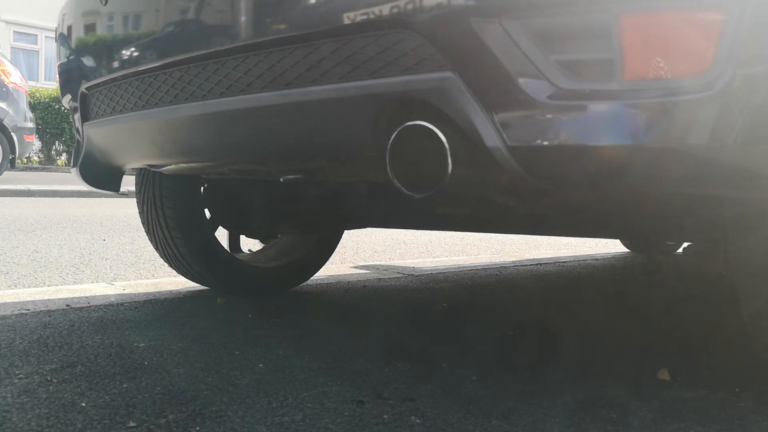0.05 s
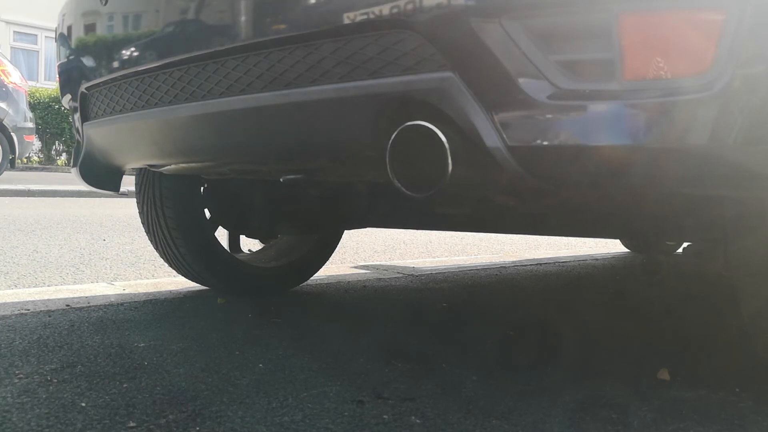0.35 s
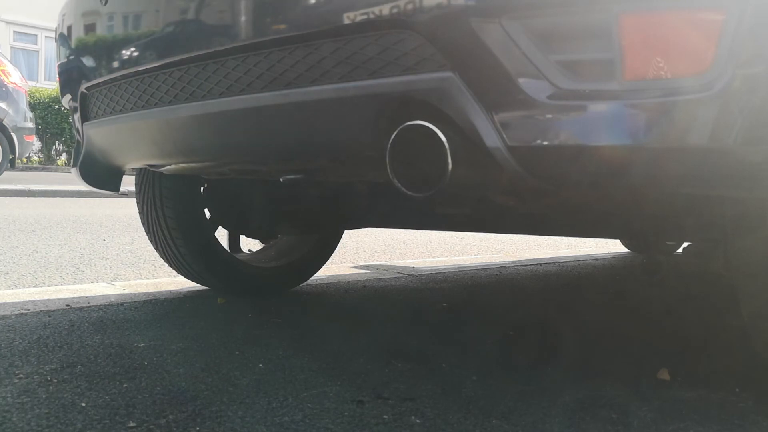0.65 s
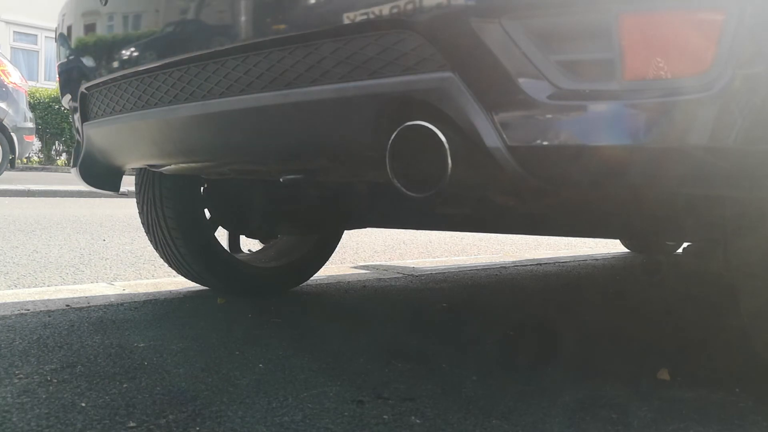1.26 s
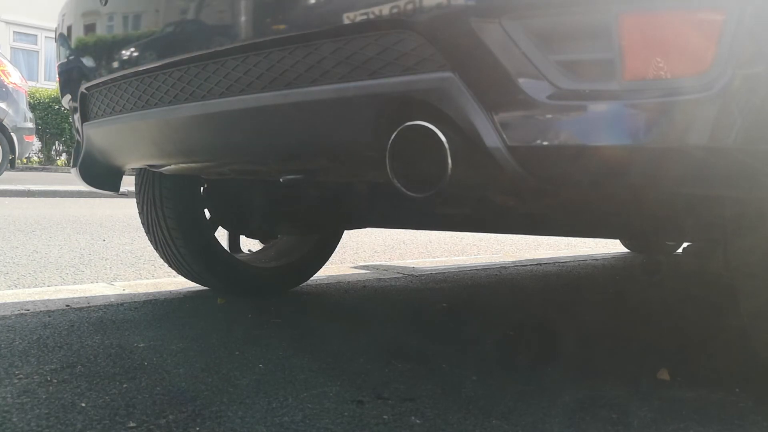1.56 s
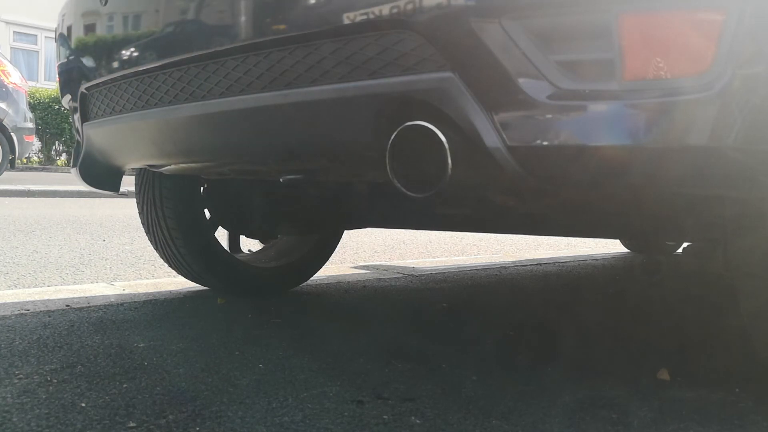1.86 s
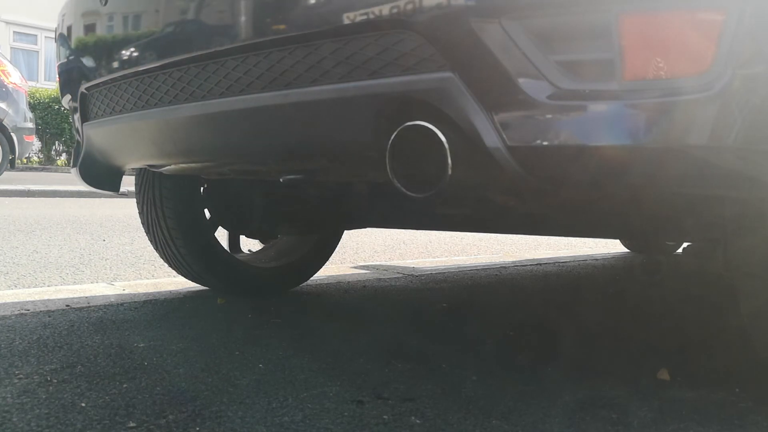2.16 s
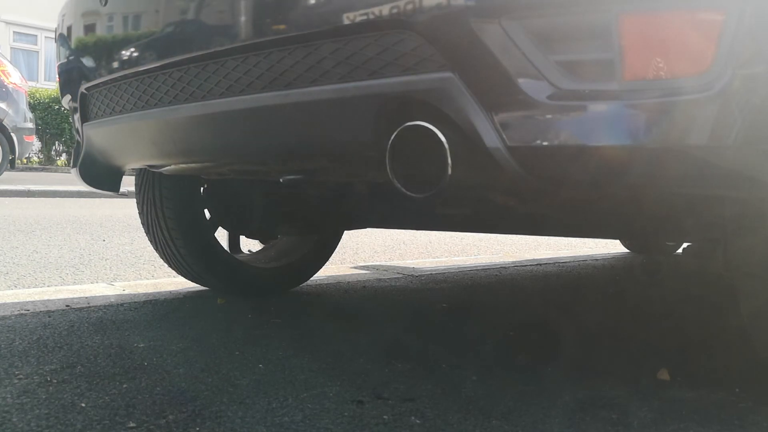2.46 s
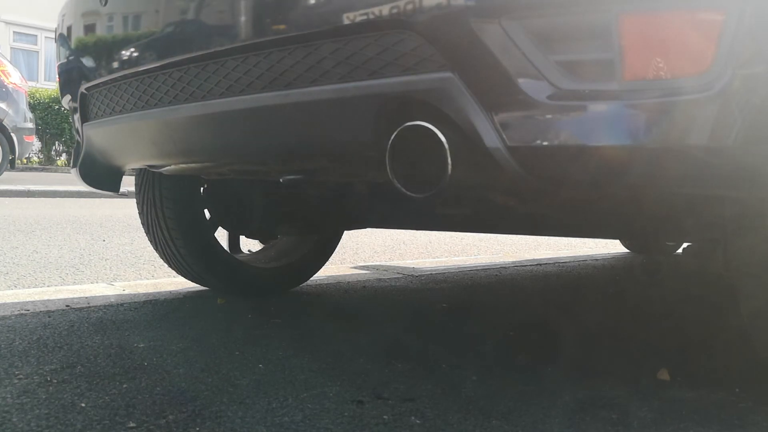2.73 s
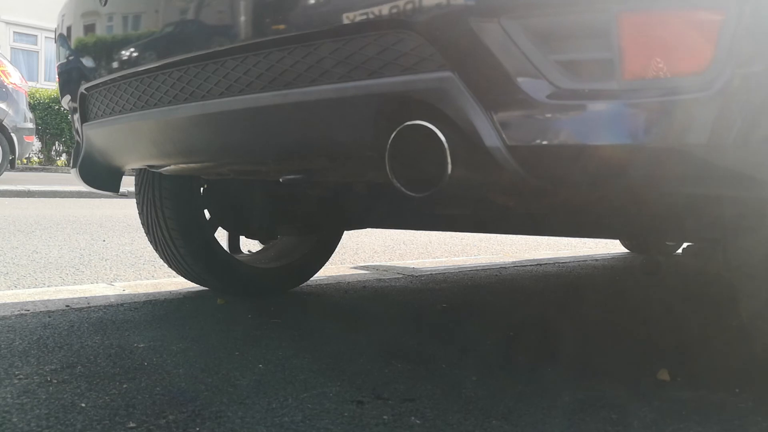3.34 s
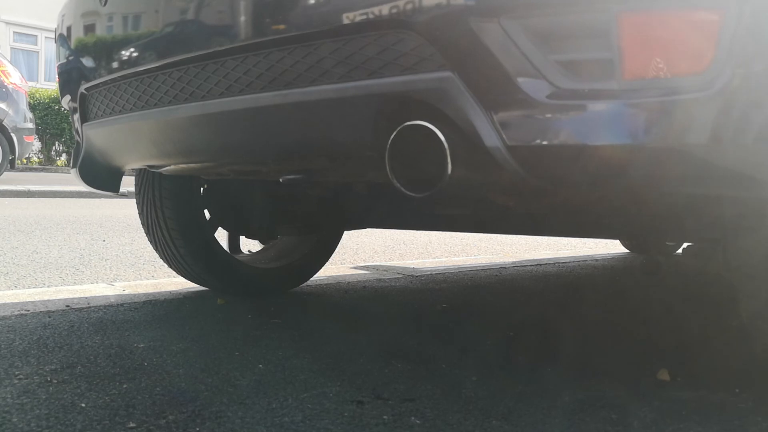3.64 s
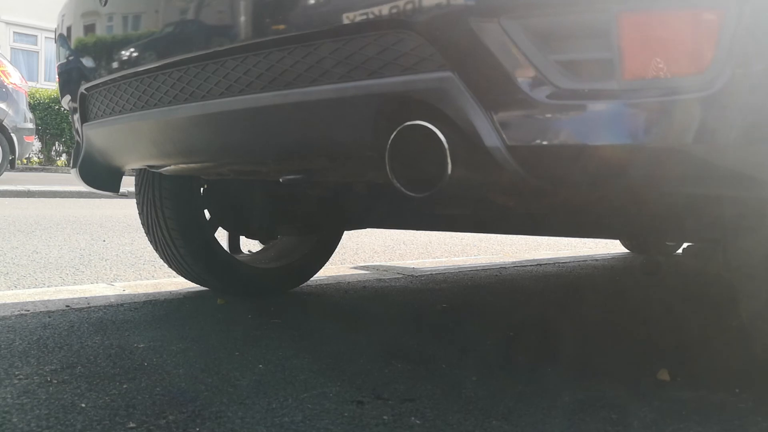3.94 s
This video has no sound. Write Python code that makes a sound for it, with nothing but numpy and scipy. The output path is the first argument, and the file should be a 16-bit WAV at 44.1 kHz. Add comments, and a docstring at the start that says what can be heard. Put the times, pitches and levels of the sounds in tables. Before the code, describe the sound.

A car is switched off, puffing to a stop before its door opens and slams.

```python
"""A car engine idles, is switched off and puffs to a stop, heard low behind the car in a quiet street.
Exhaust pulses ring the tailpipe, and friction slows them after key-off. Distant traffic washes by
and turbulent wind buffets the microphone. Parts click and scrape in the cabin and the latch lets go.
The door slams: impacts excite its panel modes while it pumps the cabin air into a boom.
Keys clash and ring as the driver steps away; road, bodywork and house fronts reflect these sounds."""
import sys
import numpy as np
from scipy import signal
from scipy.fft import rfft, irfft
from scipy.io import wavfile
from scipy.ndimage import map_coordinates

SR = 44100
rng = np.random.default_rng(int(sys.argv[2]) if len(sys.argv) > 2 else 0)


def generate_wav(sig):
    """Save sig (samples, or channels by samples) to the path in sys.argv[1] as 16-bit PCM at SR."""
    pcm = np.round(np.clip(np.atleast_2d(sig).T, -1, 1) * 32767).astype(np.int16)
    wavfile.write(sys.argv[1], SR, pcm)


N = 176400
T, FREQS = np.arange(N) / SR, np.fft.rfftfreq(N, 1 / SR)
HIT_T = T[:SR // 2]
IDLE_HZ, KEY_OFF_S = 40.9, .265
DOOR_CORRELATION = .23  # between left and right

# Harmonics of the idle (multiple of the firing rate [1], level [dB])
IDLE_HARMONICS = [(2, -26.5), (3, -35.5), (4, -40), (5, -51)]
# Exhaust hiss at idle (frequency [Hz], relative density [dB])
IDLE_SPECTRUM = [(150, 12), (450, -2.5), (600, -4), (740, -2), (950, -13), (2000, -10), (2800, -13.5),
                 (4000, -22.5), (5300, -20.5), (8000, -21.5), (11000, -36), (15000, -46.5)]
# Exhaust hiss while coasting (frequency [Hz], relative density [dB])
PUFF_SPECTRUM = [(300, -3.5), (700, -7.5), (1300, -16), (1900, -7.5), (2700, -6), (3900, -22), (5300, -8),
                 (6300, -17), (7700, -9.5), (10500, -24.5), (15000, -35.5)]
# Tailpipe resonances that colour the puffs (frequency [Hz], boost [dB])
PIPE_RESONANCES = [(1650, 6), (2680, 4.5), (4800, 5.5), (7750, 5.5), (9300, 5)]
# Envelope of the coasting puffs (time [s], level [dB])
PUFF_ENVELOPE = [(.28, -40.5), (.36, -41.5), (.44, -50.5), (.5, -46), (.55, -41.5), (.65, -40),
                 (.72, -45.5), (.81, -51)]
# Air churning in the silencer (frequency [Hz], relative density [dB])
GURGLE_SPECTRUM = [(120, 9), (200, -5.5), (330, -22.5), (500, -31), (750, -31), (1100, -40), (2300, -37),
                   (4000, -66)]
# Distant traffic (frequency [Hz], relative density [dB])
TRAFFIC_SPECTRUM = [(30, 15), (200, 11.5), (400, 2), (700, 3), (2200, 3), (3000, -0.5), (4300, -6),
                    (8000, -7), (11000, -16.5), (15000, -19)]
# Slow envelope of the wind (time [s], level [dB])
WIND_ENVELOPE = [(.85, -34), (1.08, -37), (1.35, -26), (1.65, -25), (1.76, -33.5), (1.9, -26),
                 (2.28, -27.5), (2.36, -22.5), (2.53, -18.5), (2.61, -27), (2.85, -23), (3.3, -22),
                 (3.45, -22), (3.55, -24.5), (3.7, -21.5), (3.83, -31.5), (3.95, -21.5)]
# Turbulence at its reference speed (frequency [Hz], relative density [dB])
EDDY_SPECTRUM = [(10, -5), (25, 0), (45, 1.5), (80, 0), (130, -6.5), (180, -15), (260, -25), (350, -38.5),
                 (500, -51), (900, -76.5), (3000, -100)]
# Coherence of the turbulence (frequency [Hz], left-right correlation [1])
EDDY_CORRELATION = [(40, 1), (100, 0.76), (200, 0.37), (400, 0.55)]
# Quick gusts (time [s], strength before scaling [dB], width [s])
QUICK_GUSTS = [(1.568, 9, 0.0063), (1.661, 12.5, 0.018), (1.865, 20, 0.0056), (2.004, 10, 0.0078),
               (2.113, 15, 0.0048), (2.762, 14, 0.0058), (2.849, 13, 0.01343), (2.922, 12.5, 0.01177),
               (3.004, 16.5, .01), (3.031, 20, 0.0038), (3.404, 17, 0.0043), (3.437, 11, .018),
               (3.541, 15, 0.0084), (3.649, 17, 0.0052), (3.702, 12.5, 0.0048), (3.76, 21.5, 0.0058)]
# Thin edge of a quick gust (frequency [Hz], relative density [dB])
FLUTTER_SPECTRUM = [(150, -9.5), (280, -1), (420, -2), (750, -10), (1100, -29), (3000, -59)]
# Large pressure swings of the wind (time [s], relative level [dB], width [s])
PRESSURE_SWINGS = [(3.313, -3, 0.0066), (3.441, -3, 0.0083)]
# Lock and trim clicks (time [s], level [dB], centre [Hz], half-width [octaves], decay [s])
LOCK_CLICKS = [(0.527, -38, 4430, 1.3, 0.0066), (.857, -43, 8150, 0.65, 0.0083),
               (0.856, -47, 475, 0.51, 0.01), (1.651, -47, 5350, 0.47, 0.0045),
               (1.654, -43.5, 1750, 0.77, 0.0069), (2.378, -53.5, 6750, 0.51, 0.0084),
               (2.608, -26, 720, 0.76, 0.0027), (2.654, -35, 2300, 1.13, 0.0076),
               (2.661, -34, 650, .8, .012), (2.682, -26.5, 1900, 0.29, 0.0047),
               (2.6905, -21, 1500, 0.49, 0.0034), (2.793, -37.5, 2000, 0.31, .0035),
               (2.792, -48.5, 8500, 0.36, 0.0023), (3.236, -49, 4100, .07, .009),
               (3.883, -26, 417, 0.53, 0.0066), (3.892, -34, 9100, 0.59, 0.0016),
               (3.954, -27.5, 1900, 0.79, 0.0019), (3.966, -34.5, 2200, 2, 0.0045)]
# Sliding strokes (time [s], length [s], level [dB], tilt [dB/octave])
STROKES = [(1.212, 0.032, -57, -4.5), (1.4, 0.046, -42.5, -2), (2.605, 0.056, -41, -4),
           (2.649, 0.046, -34.5, -1.5), (3.879, 0.12, -50.5, 3), (3.942, 0.043, -34.5, -6)]
# Sliding friction (frequency [Hz], relative density [dB])
FRICTION_SPECTRUM = [(400, -2), (600, -8.5), (850, -4.5), (1300, -6.5), (1900, 5), (2700, -1),
                     (3800, -13.5), (6000, -16.5), (9300, -14.5), (15000, -38)]
# Blows of latch, striker, seal and rattles (time [s], level [dB], tilt [dB/octave], decay [s])
DOOR_BLOWS = [(3.105, -12, 1.5, 0.0058), (3.1118, -22, -2.5, 0.0039), (3.119, -20, 7.5, 0.0074),
              (3.1244, -16.5, 2, 0.011), (3.151, -25, 3.5, 0.014), (3.16, -34, -5, 0.063),
              (3.201, -35, 3, 0.012), (3.292, -44, 1, .012)]
# Dense vibration of the door panel (frequency [Hz], relative density [dB])
PANEL_SPECTRUM = [(200, -3), (320, 4.5), (480, 0), (680, -2.5), (1000, -2), (1300, -3.5), (2100, -7),
                  (2800, -12), (4400, -18.5), (6200, -26), (8000, -25), (10000, -36.5), (15500, -56)]
# Distinct modes of the door (frequency [Hz], relative level [dB])
PANEL_MODES = [(463, -8), (590, -7), (970, -0.5), (1205, 1), (1261, 2), (1325, 0), (1749, -2.5), (1970, -7),
               (2280, -6.5), (2511, -2), (2618, -2), (2737, -2), (2800, -14.5), (3288, -9.5)]
# Modes of cabin air and body shell (time [s], frequency [Hz], relative level [dB], decay [s])
CABIN_MODES = [(3.121, 46.9, 3.5, 0.054), (3.123, 240.4, -15.5, 0.028), (3.148, 79.1, -1, 0.052)]
# Knocks between keys (time [s], clash level [dB], ring gain [dB])
KEY_KNOCKS = [(3.811, -47, -77), (3.849, -48.5, -40), (3.877, -61, -60), (3.922, -44, -49.5),
              (3.976, -46.5, -53), (3.987, -39, -54)]
# Keys brushing together (frequency [Hz], relative density [dB])
CLASH_SPECTRUM = [(3000, -6.5), (9300, -4), (10800, -9), (13200, -13), (14800, -5.5)]
# Modes of the keys (frequency [Hz], relative level [dB])
CHIME_MODES = [(7850, 12.5), (9150, 13), (9480, 8), (14300, 3), (14900, 4)]
# Level difference for sound from the door side (frequency [Hz], left minus right [dB])
SIDE_BALANCE = [(200, -6.5), (600, -4.5), (1100, -3.5), (2380, -1), (4400, -5.5), (8120, -3)]
# Reverberation of the street (frequency [Hz], time to fall 60 dB [s])
REVERB_TIMES = [(200, 0.59), (1000, 0.43), (2500, 0.85), (6000, 0.94), (14000, 0.29)]


def amp(db):
    """Amplitude ratio of a level in decibels."""
    return 10 ** (np.asarray(db) / 20)


def unit(x):
    """Normalisation to rms 1."""
    return x / np.sqrt(np.mean(x ** 2) + 1e-20)


def read(points, hz):
    """Interpolation of a table on a log-frequency axis."""
    f, value = np.transpose(points)
    return np.interp(np.log(hz + 1), np.log(f + 1), value)


def add(mix, s, sound):
    """Superposition of a sound on the mix, starting at s seconds."""
    part = mix[:, max(round(s * SR), 0):][:, :sound.shape[-1]]
    part += sound[..., :part.shape[1]]


def bell(t, width):
    """Gaussian pulse of height 1."""
    return np.exp(-.5 * (t / width) ** 2)


def wander(size, hz):
    """Random fluctuation of rms 1, low-passed at hz."""
    rolloff = 1 + (np.fft.rfftfreq(size, 1 / SR) / hz) ** 4
    return unit(irfft(rfft(rng.standard_normal(size)) / rolloff, size))


def noise(size, colour, correlation):
    """Partially coherent stereo noise of rms 1; colour gives relative dB at each frequency."""
    a, b = rfft(rng.standard_normal((2, size)))
    mid, side = a * np.sqrt(1 + correlation), b * np.sqrt(1 - correlation)
    gain = amp(colour(np.fft.rfftfreq(size, 1 / SR) + 1))
    return unit(irfft(np.array([mid + side, mid - side]) * gain, size))


def tilted(points, tilt_db=0, low_hz=250):
    """A spectrum tilted about 2 kHz and high-passed at low_hz."""
    return lambda f: (read(points, f) + tilt_db * np.log2(f / 2000)
                      - 10 * np.log10(1 + (low_hz / f) ** 4))


def ring(modes, t60):
    """Free decay of damped modes; neighbours start in roughly opposite phase."""
    tones = sum((-1) ** k * amp(db) * np.sin(2 * np.pi * (hz * HIT_T + rng.normal(0, .068, (2, 1))))
                for k, (hz, db) in enumerate(modes))
    return amp(-60 * HIT_T / t60) * tones


def exhaust_pulses(rate, cycles):
    """Impulse excitation: each stroke rings the pipe. Returns thumps and the coasting puffs' envelope."""
    last_pulse_s, pipe_hz, pipe_decay_s = .83, 43, .035
    thumps, puffs = np.zeros(N), np.zeros(N)
    for i in np.flatnonzero(np.diff(np.floor(cycles)) * (T[1:] < last_pulse_s)):
        t, fired = T[:SR * 2] - T[i], T[i] < KEY_OFF_S
        after = np.maximum(t, 0)
        db, width = (-5.5, .0042) if fired else (-.5, .0031)
        push = amp(db) * bell(t, width) * (rate[i] / IDLE_HZ) ** .46
        pipe = amp(-15.5) * np.cos(2 * np.pi * pipe_hz * after) * np.exp(-after / pipe_decay_s)
        onset = 1 - np.exp(-(after / width / 2) ** 2)
        thumps[:len(t)] += push + pipe * onset
        if not fired:  # air puffs out, then back in
            back_s = min(.58 / rate[i], .025)
            backflow = amp(-5.5) * (rate[i] > IDLE_HZ / 4) * bell(t - back_s, .27 * back_s)
            puffs[:len(t)] += bell(t, .003) + backflow
    return signal.sosfilt(signal.butter(1, 7, "high", fs=SR, output="sos"), thumps), puffs


def idle(cycles):
    """Periodic firing gives a harmonic hum and modulates the hiss; a drone wavers alongside."""
    drone_hz = 331
    hum = sum(amp(db) * np.sqrt(2) * np.cos(2 * np.pi * k * cycles) * amp(wander(N, 6.1))
              for k, db in IDLE_HARMONICS)
    drone = amp(-45.5) * np.sqrt(2) * np.cos(2 * np.pi * drone_hz * T) * (1 + .67 * wander(N, 54))
    throb = 1 + .25 * np.cos(2 * np.pi * cycles)
    return hum + drone + amp(-46.5) * noise(N, tilted(IDLE_SPECTRUM), .22) * throb


def tailpipe(f):
    """Resonance of the pipe lifts peaks in the spectrum of a puff, given in dB."""
    width_hz = 280
    peaks = sum(db / (1 + (2 * (f - hz) / width_hz) ** 2) for hz, db in PIPE_RESONANCES)
    return tilted(PUFF_SPECTRUM)(f) + peaks


def engine():
    """Friction slows the engine after key-off, and firing gives way to the pumping of air."""
    first_pulse_s, slowing_s, friction_hz = .011, .9, 30
    rate = (IDLE_HZ + friction_hz) * np.exp(-np.maximum(T - KEY_OFF_S, 0) / slowing_s) - friction_hz
    cycles = np.cumsum(np.maximum(rate, 0)) / SR - first_pulse_s * IDLE_HZ
    firing = np.clip((KEY_OFF_S - T) / .03 + 1, 0, 1)
    coasting = (1 - firing) * np.sqrt(np.clip(rate / IDLE_HZ, 0, 1))
    thumps, puffs = exhaust_pulses(rate, cycles)
    running = firing * idle(cycles)
    puff_gain = amp(np.interp(T, *np.transpose(PUFF_ENVELOPE)))
    air = (puffs + .11 * coasting) * puff_gain * noise(N, tailpipe, .37)
    gurgle = amp(-31.5) * coasting * noise(N, tilted(GURGLE_SPECTRUM, low_hz=108), .91)
    return thumps + running + air + gurgle


def traffic():
    """Distant traffic sums incoherently to a gently swelling noise."""
    return amp(-61 + .7 * wander(N, 4.7)) * noise(N, lambda f: read(TRAFFIC_SPECTRUM, f), .1)


def wind():
    """Advection carries eddies past the microphone, so a gust is both louder and brighter."""
    loudening, brightening = .57, .13
    level_db = np.interp(T, *np.transpose(WIND_ENVELOPE))
    buffet_db = sum(db * bell(T - s, width) for s, db, width in QUICK_GUSTS)
    gust_db = 3 * wander(N, 13.4) + buffet_db
    travel = np.cumsum(amp(brightening * (gust_db + level_db - level_db.mean())))
    eddies = noise(N, lambda f: read(EDDY_SPECTRUM, f), read(EDDY_CORRELATION, FREQS))
    passing = np.array([map_coordinates(e, [travel], order=3, mode="grid-wrap") for e in eddies])
    out = amp(level_db + loudening * gust_db) * passing
    out += amp(-62.5) * (amp(buffet_db) - 1) * noise(N, lambda f: read(FLUTTER_SPECTRUM, f), .092)
    for s, db, width in PRESSURE_SWINGS:
        u = (T - s) / width
        out -= amp(db) * 2 * u * np.exp(-u ** 2)
    return out


def clicks():
    """Heavy damping: each small part of lock and trim gives a brief burst in its own band."""
    out = np.zeros((2, N))
    attack = np.minimum(HIT_T / .0007, 1) ** 2
    for s, db, hz, octaves, decay in LOCK_CLICKS:
        band = noise(len(HIT_T), lambda f: -20 * np.log10(1 + (np.log2(f / hz) / octaves) ** 4),
                     DOOR_CORRELATION)
        add(out, s, amp(db) * band * attack * np.exp(-HIT_T / decay))
    return out


def scrapes():
    """Sliding friction makes grainy noise: movement in the cabin, handle and latch, a shoe on asphalt."""
    rise_s, fall_s = .0026, .0066
    out = np.zeros((2, N))
    for s, length, db, tilt_db in STROKES:
        envelope = np.minimum(HIT_T / rise_s, 1) * np.exp(-np.maximum(HIT_T - length, 0) / fall_s)
        grain = unit(amp(2 * wander(len(HIT_T), 280)))
        rub = noise(len(HIT_T), tilted(FRICTION_SPECTRUM, tilt_db, low_hz=366), DOOR_CORRELATION)
        add(out, s, amp(db) * envelope * grain * rub)
    return out


def door():
    """Impact excitation: each blow gives a crack of dense panel vibration and a few ringing modes."""
    out = np.zeros((2, N))
    attack = np.minimum(HIT_T / .0012, 1)
    for s, db, tilt_db, decay in DOOR_BLOWS:
        panel = noise(len(HIT_T), tilted(PANEL_SPECTRUM, tilt_db, low_hz=220), DOOR_CORRELATION)
        crack = panel * np.exp(-HIT_T / decay)
        ringing = amp(-14.5) * ring(PANEL_MODES, t60=.15)
        add(out, s, amp(db) * (crack + ringing) * attack)
    return out


def boom():
    """The closing door pumps the cabin air and body shell, which respond as damped oscillators."""
    out = np.zeros((2, N))
    attack = 1 - np.exp(-HIT_T / .00026)
    for s, hz, db, decay in CABIN_MODES:
        add(out, s, .59 * amp(db) * np.sin(2 * np.pi * hz * HIT_T) * np.exp(-HIT_T / decay) * attack)
    return out


def keys():
    """Each collision gives a brushing clash and its own amount of modal ring, slightly detuned."""
    clash_decay_s, detune = .039, .008
    out = np.zeros((2, N))
    attack = np.minimum(HIT_T / .0037, 1)
    for s, clash_db, ring_db in KEY_KNOCKS:
        brush = noise(len(HIT_T), tilted(CLASH_SPECTRUM, low_hz=1980), .21)
        clash = brush * np.exp(-HIT_T / clash_decay_s)
        chime = ring([(hz * rng.normal(1, detune), db) for hz, db in CHIME_MODES], t60=.05)
        add(out, s, attack * (amp(ring_db) * chime + amp(clash_db) * clash))
    return out


def street(x):
    """Reflection: sound from the car's side returns off road and bodywork, then off the house fronts."""
    left_lag_s, near_decay_s = .000297, .011  # the door lies to the right
    sides = np.array([[.5], [-.5]])
    delay = np.exp(-2j * np.pi * FREQS * sides * left_lag_s)
    direct = irfft(rfft(x) * amp(sides * read(SIDE_BALANCE, FREQS)) * delay, N)
    hz, t, bands = signal.stft(rng.standard_normal((2, SR)), SR, nperseg=256)
    decay = amp(-60 * t / read(REVERB_TIMES, hz)[:, None])
    far = signal.istft(bands * decay, SR, nperseg=256)[1][:, :SR] * np.minimum(T[:SR] / .043, 1)
    near = rng.standard_normal((2, SR)) * np.exp(-T[:SR] / near_decay_s) * np.minimum(T[:SR] / .0045, 1)
    response = (amp(-27.5) * unit(far) + amp(-14) * unit(near)) / np.sqrt(SR)
    return direct + signal.fftconvolve(direct, response, axes=1)[:, :N]


def scene():
    """Superposition of traffic, car and wind; the sounds at the door carry the street's reflections."""
    return traffic() + engine() + boom() + street(door() + scrapes() + clicks() + keys()) + wind()


def record(dry):
    """Soft saturation rounds the peaks, then a low-pass filter limits the band."""
    cutoff_hz = 15700
    soft = dry / (1 + dry ** 8) ** (1 / 8)
    lowpass = signal.firwin(511, cutoff_hz, window=("kaiser", 9), fs=SR)
    return signal.oaconvolve(soft, lowpass[None], "same")


dry = scene()
out = record(dry)
generate_wav(out)
```